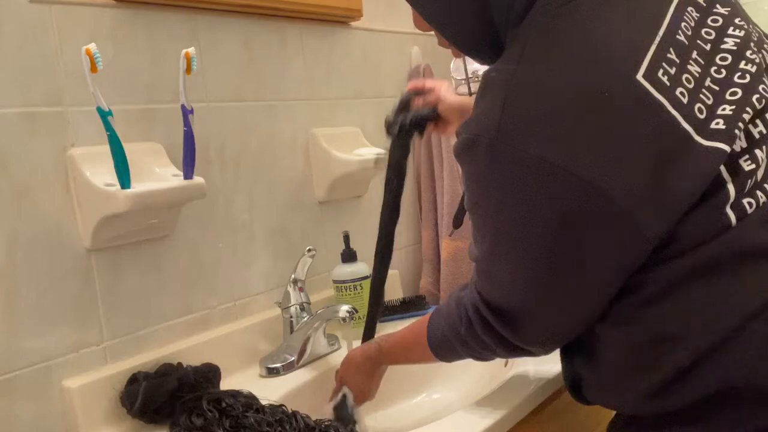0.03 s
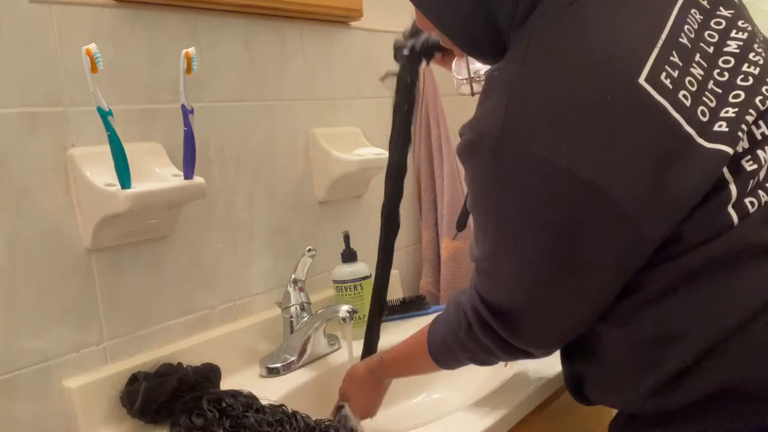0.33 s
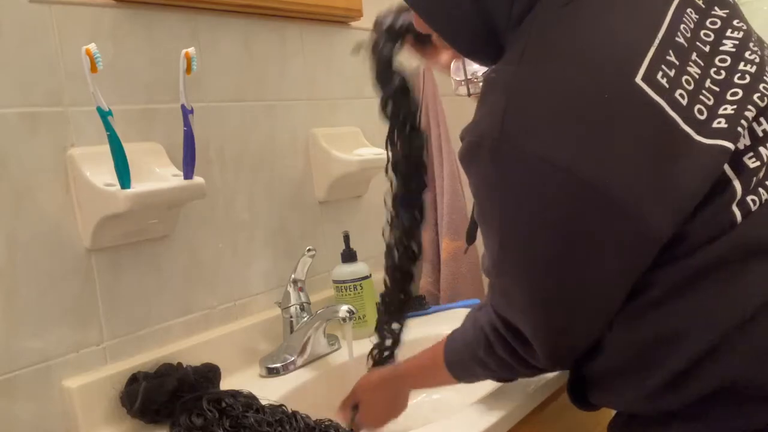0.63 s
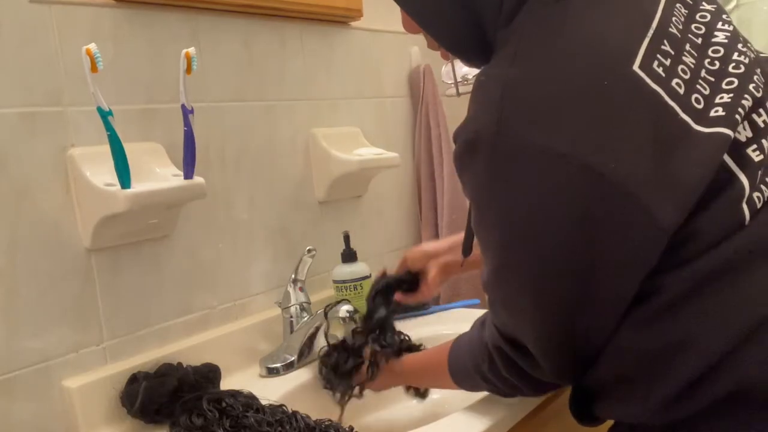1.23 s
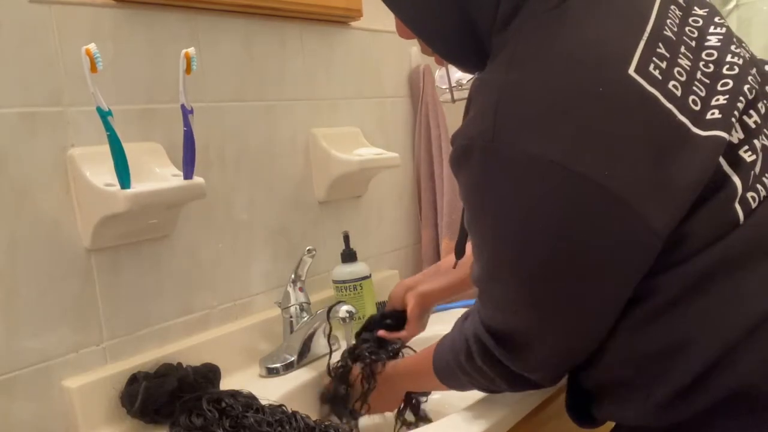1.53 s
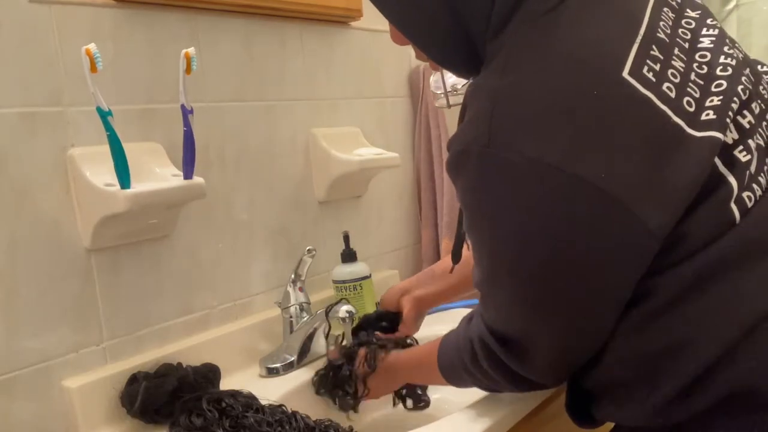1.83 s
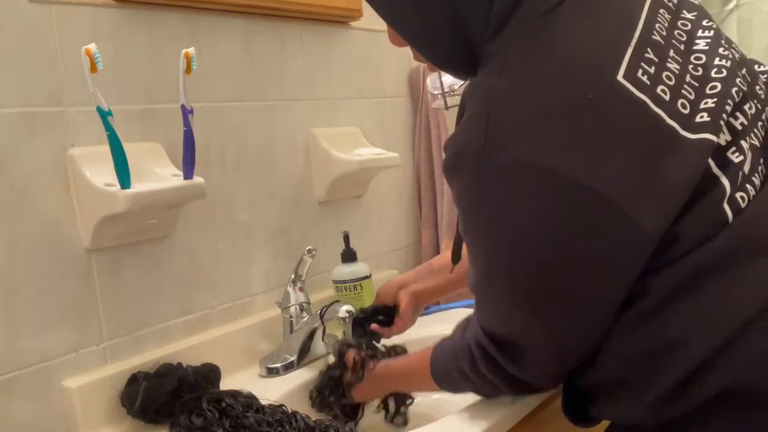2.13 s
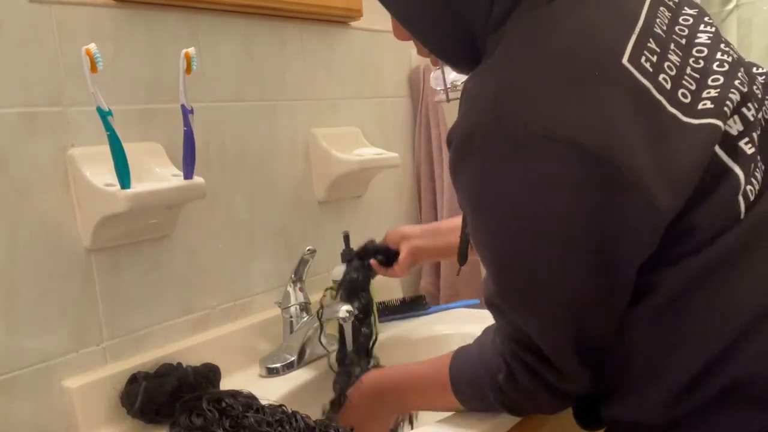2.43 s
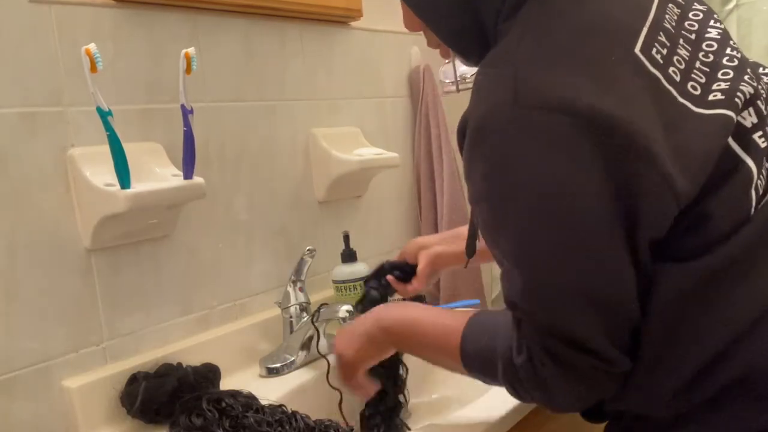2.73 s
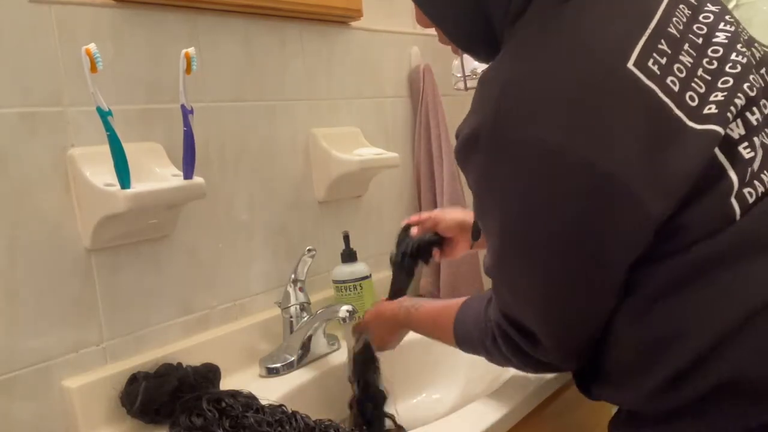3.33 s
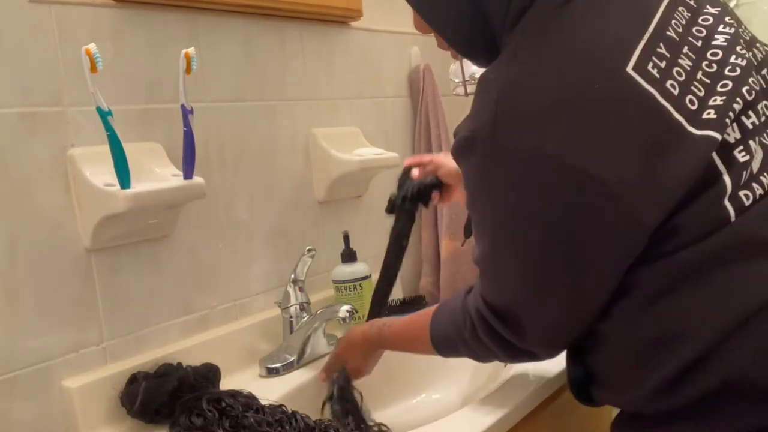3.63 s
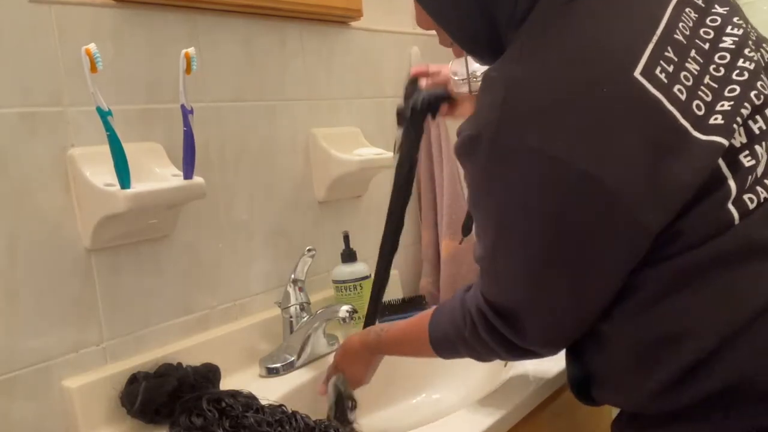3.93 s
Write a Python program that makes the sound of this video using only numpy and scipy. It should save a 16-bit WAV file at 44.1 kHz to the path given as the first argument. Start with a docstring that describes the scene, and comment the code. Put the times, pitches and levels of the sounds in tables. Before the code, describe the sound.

Water squishes and drips from wet hair into a basin while a tap runs softly.

```python
"""Wet hair is drawn out and squeezed over a bathroom basin. From the start the tap runs thinly over a
steady hum and a deep, cycling rumble, like a machine elsewhere in the house. Each squeeze bursts a cloud
of tiny bubbles amid fine spatter, and single drops tick. A dull bump near 0.45 s leads into a busy
flurry with plops of draining water. The middle thins out; from 2.6 s the squeezes crowd in again.
The tiled room rings briefly after every splash."""
import sys
import numpy as np
from scipy import signal
from scipy.fft import rfft, irfft
from scipy.io import wavfile
from scipy.ndimage import uniform_filter1d

SR = 44100
rng = np.random.default_rng(int(sys.argv[2]) if len(sys.argv) > 2 else 0)


def wav_record(signal):
    """Record a signal, one row per channel, as 16-bit PCM in the file named by sys.argv[1]."""
    frames = np.transpose(np.atleast_2d(signal))
    bounded = np.clip(frames, -1, 1)
    # unit amplitude maps onto the largest positive 16-bit level
    quanta = np.round(bounded * 32767).astype(np.int16)
    wavfile.write(sys.argv[1], SR, quanta)


N = 176400

# stereo width of diffuse sound, side against mid (frequency [Hz], level [dB])
SIDE_EQ = [(60, -2), (130, -3.5), (260, -7.5), (500, 1), (1200, 4.5), (4000, 6), (8000, 3.5), (13000, 3)]
# room tone (frequency [Hz], level [dB])
AIR_EQ = [(25, -15), (60, 5), (108, 3), (135, -0.5), (230, -1.5), (325, -7), (370, -1), (450, -6),
          (650, -13), (1000, -25.5), (2000, -35)]
# the hum's three partials (pitch [Hz]), (level [dB]), (pitch waver [Hz])
HUM_PITCHES = [150.5, 356.5, 726.5]
HUM_LEVELS = [-56.5, -69, -78]
HUM_WAVERS = [0.63, 2.92, 3.34]
# one cycle of the rumble (time [s], pitch [Hz])
RUMBLE_GLIDE = [(0, 69.1), (.22, 76.1), (.34, 61.4), (.6, 57.13), (.82, 62.63), (1.0, 50.3), (1.2, 69.95),
                (1.33, 55.3), (1.6, 71.45)]
# swells and dips of the rumble (time [s], level [dB])
RUMBLE_FADER = [(0.0, -29), (0.15, -41.5), (0.19, -32), (0.31, -48.5), (0.36, -30.5), (0.52, -44.5),
                (0.63, -32), (0.72, -33.5), (0.77, -55), (0.8, -35), (0.96, -44), (1.17, -45.5),
                (1.25, -36), (1.34, -65), (1.45, -40.5), (1.49, -77), (1.57, -48), (1.64, -35), (1.9, -37),
                (1.95, -43.5), (2.07, -32.5), (2.14, -47.5), (2.33, -33), (2.41, -35), (2.46, -52),
                (2.49, -39), (2.87, -50), (2.93, -33.5), (2.99, -74), (3.03, -40), (3.13, -59),
                (3.44, -33.5), (3.59, -42), (3.64, -27.5), (3.71, -59), (3.74, -31.5), (3.85, -51),
                (3.89, -41.5), (4.0, -35)]
# the rumble's bass band (frequency [Hz], level [dB])
RUMBLE_EQ = [(25, -25), (38, -41), (47, 1.5), (76, 1.5), (88, -13), (150, -61)]
# hiss of the tap (frequency [Hz], level [dB])
STREAM_EQ = [(200, -42), (600, -3.5), (1400, 2), (2200, 0), (4500, -2), (7200, -1.5), (9500, -9.5),
             (14000, -13.5)]
# spatter on the basin, highest while the hair is swung and let down (time [s], level [dB])
SPATTER_FADER = [(0, -62), (.42, -66), (0.549, -54), (.68, -60), (.8, -54), (1.02, -56.5), (1.16, -63),
                 (2.3, -69), (2.75, -60), (3.3, -64.5), (3.56, -60), (3.7, -62.5)]
# squeezes (time [s], hold [s], level [dB], start pitch [Hz], end pitch [Hz], pitch spread [octaves])
SQUEEZE_CUES = [(0.0, 0.045, -50.5, 4380, 4560, 0.84), (0.148, .13, -57.5, 3550, 4900, 0.9),
                (0.464, 0.034, -49.5, 6500, 6400, 0.5), (0.494, 0.042, -50.5, 3940, 3700, 0.34),
                (0.528, 0.024, -46, 9500, 9900, 0.31), (0.576, 0.19, -54.5, 6200, 6700, 0.66),
                (0.736, 0.14, -51, 7550, 7400, 0.44), (.74, 0.14, -60, 2620, 1550, 0.23),
                (0.882, 0.18, -50, 8040, 7300, 0.56), (1.071, 0.033, -49, 6240, 5760, 0.51),
                (1.293, 0.016, -42.5, 4700, 4430, 0.374), (1.296, 0.023, -53.5, 1614, 1300, 0.53),
                (1.475, 0.019, -57, 8100, 6900, 0.5), (1.8, 0.043, -53, 6500, 4424, 1.06),
                (1.975, 0.033, -53.5, 5590, 5145, 0.28), (2.261, 0.022, -57, 7500, 6600, 0.21),
                (2.59, 0.023, -48, 5600, 5830, 0.25), (2.642, 0.048, -50, 6540, 6200, 0.17),
                (2.67, 0.23, -56.5, 2870, 1670, 0.44), (2.725, 0.17, -56.5, 6700, 5960, 0.43),
                (2.929, 0.22, -58.5, 3550, 2760, 1.07), (3.241, .24, -57, 4700, 3350, 0.92),
                (3.508, 0.12, -52, 6000, 5120, 0.45), (3.793, 0.03, -44.5, 3470, 3600, 0.51),
                (3.839, 0.098, -51, 4380, 4560, 0.55)]
# single drops and bursting bubbles (time [s], pitch [Hz], level [dB])
DROP_CUES = [(0.0463, 5760, -35), (0.5218, 4040, -33), (.5392, 9600, -29), (0.595, 2120, -39.5),
             (0.7056, 3904, -35), (0.7367, 6900, -27.5), (0.76, 2300, -41), (0.8011, 3180, -41),
             (.8136, 8000, -38), (0.8392, 7740, -32), (0.8563, 6760, -32), (0.9242, 8410, -39),
             (0.9667, 7340, -31), (0.9908, 7900, -28.5), (1.081, 6100, -35), (1.9825, 5735, -41.5),
             (2.6075, 5650, -34.5), (2.656, 6160, -23.5), (2.8506, 5700, -36.5), (2.935, 8500, -33.5),
             (3.514, 8200, -35.5), (3.5221, 4113, -34), (3.5646, 5270, -27), (3.683, 1530, -45.5),
             (3.8022, 2840, -36), (3.815, 2880, -37), (3.865, 3600, -38), (3.8751, 4730, -29),
             (3.989, 2110, -38.5)]
# droplets on the bare basin (time [s], level [dB])
TICK_CUES = [(.319, -41), (.5395, -34), (.6295, -40), (.737, -35), (.788, -39), (.9905, -29), (2.655, -35),
             (2.903, -30)]
# their bright click (frequency [Hz], level [dB])
TICK_EQ = [(1000, -26), (4000, -15), (13000, 0)]
# dull body of the bump (frequency [Hz], level [dB])
BUMP_EQ = [(60, -21), (110, 7), (280, -2.5), (450, -23), (900, -23), (6000, -72)]
# plops of water running off (time [s], start pitch [Hz], level [dB])
PLOP_CUES = [(.722, 3030, -49), (.777, 2190, -50), (.81, 3120, -50), (0.814, 1540, -46), (.836, 1757, -44),
             (.853, 2020, -52), (2.795, 1634, -50)]
# tone of the tiled room's reverb (frequency [Hz], level [dB])
REVERB_EQ = [(500, 6), (5000, -3.5), (8000, -1), (14000, 8)]
# a deep dip in the treble near 10 kHz, easing toward the top (frequency [Hz], level [dB])
TREBLE_DIP_EQ = [(9400, 1.5), (10100, -19), (14500, -3.5)]


def amp(db):
    """Decibels to gain."""
    return 10 ** (np.asarray(db) / 20)


def unit(x):
    """Scale to rms 1."""
    return x / np.sqrt(np.mean(x ** 2) + 1e-20)


def eq(x, points):
    """Filter by a curve of (frequency [Hz], level [dB]) points."""
    hz, db = np.array(points, float).T
    freqs = np.fft.rfftfreq(x.shape[-1], 1 / SR)
    gain = amp(np.interp(np.log(freqs + 1), np.log(hz), db))
    return irfft(rfft(x) * gain, x.shape[-1])


def fader(points):
    """Gain that rides through (time [s], level [dB]) points."""
    return amp(np.interp(np.arange(N) / SR, *np.array(points).T))


def diffuse(length):
    """Stereo noise that arrives from all sides."""
    mid, side = rng.standard_normal((2, length))
    side = eq(side, SIDE_EQ)
    return np.array([mid + side, mid - side])


def wander(rate_hz):
    """Slow random drift with rms 1."""
    span = int(SR / rate_hz)
    steps = rng.standard_normal(1000)[np.arange(N) // span]
    return unit(uniform_filter1d(steps, span))


def bubbles(times, hz, gains, decay_cycles, rise_cycles):
    """Sum of short sine pings, each swelling and dying over a set number of cycles."""
    k = np.arange(512)
    cycles = np.clip(hz, 300, .42 * SR)[:, None] * k / SR
    envelope = np.exp(-cycles / decay_cycles) * (1 - np.exp(-cycles / rise_cycles)) * (1 - k / len(k))
    pings = gains[:, None] * np.sin(2 * np.pi * cycles) * envelope
    positions = (np.maximum(times, 0) * SR).astype(int)[:, None] + k
    return np.bincount(positions.ravel(), pings.ravel(), N)[:N]


def room_tone(air_db=-55, pan_db=1.5):
    """The bed: room air and a steady hum of three slightly wavering partials, a little to the left."""
    hum = np.zeros(N)
    for hz, db, waver_hz in zip(HUM_PITCHES, HUM_LEVELS, HUM_WAVERS):
        pitch = hz + waver_hz * wander(rate_hz=15)
        hum += amp(db) * unit(np.sin(2 * np.pi * np.cumsum(pitch) / SR))
    air = amp(air_db) * unit(eq(diffuse(N), AIR_EQ))
    return hum * amp([[pan_db / 2], [-pan_db / 2]]) + air


def rumble(cycle_s=1.718, roughness=0.35, side_db=-18, trim_db=0.2):
    """A deep, rough drone through the walls, its pitch climbing and sinking in a loop."""
    hz = np.interp(np.arange(N) / SR, *np.array(RUMBLE_GLIDE).T, period=cycle_s)
    tone = unit(np.sin(2 * np.pi * np.cumsum(hz) / SR))
    grit, side = unit(eq(rng.standard_normal((2, N)), RUMBLE_EQ))
    drone = unit(tone + roughness * grit) + amp(side_db) * np.array([side, -side])
    drone *= fader(RUMBLE_FADER) * amp(trim_db)
    return eq(np.pad(drone, ((0, 0), (0, N))), RUMBLE_EQ)[:, :N]


def stream(level_db=-60.5, waver_db=1.16):
    """Soft hiss of the running tap, wavering as the hair moves through it."""
    gain = amp(level_db + waver_db * wander(rate_hz=6.72))
    return gain * unit(eq(rng.standard_normal(N), STREAM_EQ))


def fizz(level_db=-67.5, per_s=700, centre_hz=4970, octaves=0.885, scatter_db=6):
    """Tiny bubbles ring where the stream from the tap lands."""
    count = int(per_s * N / SR)
    jitter, detune, accent = rng.standard_normal((8000, 3))[:count].T
    times = (np.arange(count) + 2 * jitter) / per_s
    hz = centre_hz * 2 ** (octaves * detune)
    gains = np.sqrt(hz) * amp(scatter_db * np.minimum(accent, 2))
    return amp(level_db) * unit(bubbles(times, hz, gains, decay_cycles=21, rise_cycles=0.44))


def spatter(per_s=900, centre_hz=11000, octaves=0.25, scatter_db=7):
    """A dense, wet prickle of fine droplets shaken from the hair."""
    count = int(per_s * N / SR)
    jitter, detune, accent = rng.standard_normal((4000, 3))[:count].T
    times = (np.arange(count) + 2 * jitter) / per_s
    hz = centre_hz * 2 ** (octaves * detune)
    gains = amp(scatter_db * np.minimum(accent, 2))
    return fader(SPATTER_FADER) * unit(bubbles(times, hz, gains, decay_cycles=4.8, rise_cycles=0.2))


def squeezes(per_s=3500, attack_s=0.009, release_s=0.021, scatter_db=4, trim_db=-2.5):
    """Water pressed from the hair: clouds of bursting bubbles whose pitch slides as the hand moves."""
    out = np.zeros(N)
    for start, hold, db, hz_from, hz_to, octaves in SQUEEZE_CUES:
        count = int((hold + 4 * release_s) * per_s)
        jitter, detune, accent = rng.standard_normal((2000, 3))[:count].T
        age = np.abs(np.arange(count) + jitter) / per_s
        swell = np.minimum(age / attack_s, 1) * np.exp(-np.maximum(age - hold, 0) / release_s)
        hz = np.interp(age, [0, hold], [hz_from, hz_to]) * 2 ** (octaves * detune)
        gains = swell * np.sqrt(hz) * amp(scatter_db * np.minimum(accent, 2))
        cloud = bubbles(start + age, hz, gains, decay_cycles=6.2, rise_cycles=0.11)
        out += unit(cloud) * np.sqrt(hold * SR / N) * amp(db)  # energy grows with the hold
    return out * amp(trim_db)


def drops(trim_db=4.5):
    """Single drops land in the basin, each with one short bubble ping."""
    times, hz, db = np.array(DROP_CUES).T
    return bubbles(times, hz, amp(db + trim_db), decay_cycles=4.16, rise_cycles=1.5)


def ticks(decay_s=0.00098):
    """Droplets hit the hard basin: clicks with no bubble, gone in a millisecond or two."""
    t = np.arange(N) / SR
    envelope = sum(amp(db) * (t >= start) * np.exp(-np.abs(t - start) / decay_s)
                   for start, db in TICK_CUES)
    return envelope * unit(eq(rng.standard_normal(N), TICK_EQ))


def bump(peak_s=0.45, width_s=0.033, level_db=-48):
    """A muffled knock as the hair is pulled taut."""
    t = np.arange(N) / SR
    swell = np.exp(-((t - peak_s) / width_s) ** 2 / 2)
    return amp(level_db) * swell * unit(eq(diffuse(N), BUMP_EQ))


def plops(attack_s=0.0023, decay_s=0.0082, rise_per_s=2.33):
    """Larger bubbles in the draining water ring longer and bend upward as they near the surface."""
    out = np.zeros(N)
    for start, hz, db in PLOP_CUES:
        age = np.maximum(np.arange(N) / SR - start, 0)
        cycles = hz * (age + rise_per_s * age ** 2 / 2)
        envelope = np.exp(-age / decay_s) * (1 - np.exp(-age / attack_s))
        out += amp(db) * envelope * np.sin(2 * np.pi * cycles)
    return out


def bathroom(x, t60_s=0.096, predelay_s=0.00069, wet_db=-2):
    """Direct sound plus the short stereo ring of tiled walls."""
    t = np.arange(SR // 2) / SR
    fade = np.exp(-np.log(1000) * t / t60_s) * (t > predelay_s)
    tail = eq(unit(diffuse(len(t))), REVERB_EQ) * unit(fade) / np.sqrt(len(t))
    return x + amp(wet_db) * signal.fftconvolve(x[None], tail, axes=1)[:, :N]


def scene(left_db=0.5, right_lag_s=0.000026):
    """The mix: water in the room over the low bed, a touch earlier and louder on the left."""
    water = squeezes() + drops() + plops() + ticks() + spatter() + fizz() + stream()
    left, right = bathroom(water) + bump() + room_tone() + rumble()
    delay = np.exp(-2j * np.pi * np.fft.rfftfreq(2 * N, 1 / SR) * right_lag_s)
    late_right = irfft(rfft(right, 2 * N) * delay)[:N]
    return np.array([left * amp(left_db), late_right])


def record(dry, cutoff_hz=14200):
    """Carve a deep dip near 10 kHz, then cut the very top off steeply."""
    dulled = eq(np.pad(dry, ((0, 0), (0, N))), TREBLE_DIP_EQ)[:, :N]
    high_cut = signal.ellip(8, .2, 70, cutoff_hz, fs=SR, output="sos")
    return signal.sosfilt(high_cut, dulled)


dry = scene()
out = record(dry)
wav_record(out)
```